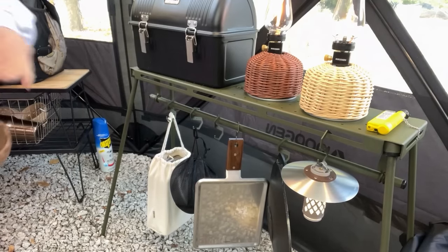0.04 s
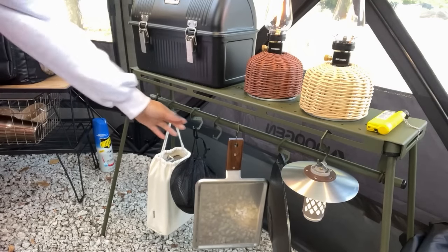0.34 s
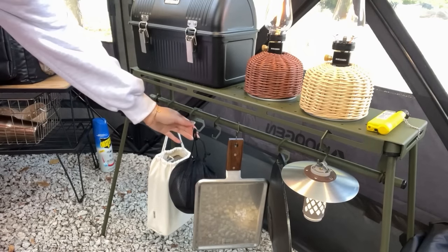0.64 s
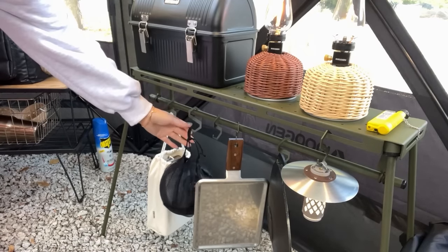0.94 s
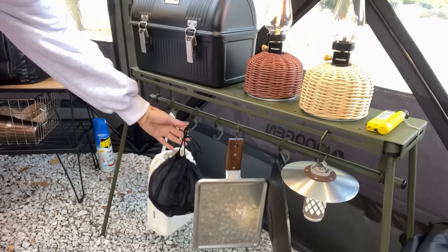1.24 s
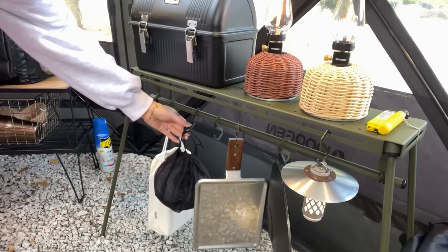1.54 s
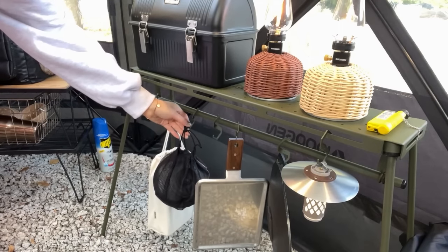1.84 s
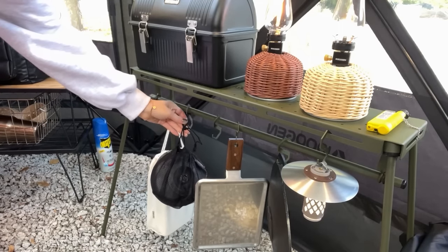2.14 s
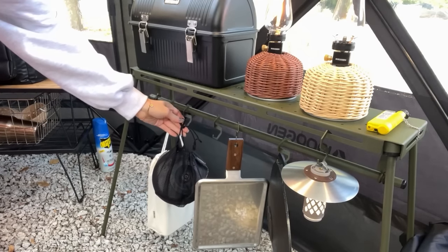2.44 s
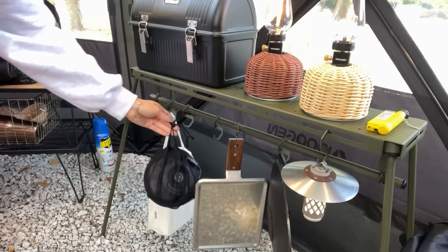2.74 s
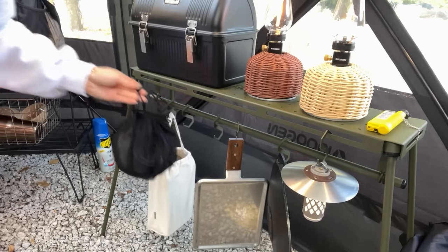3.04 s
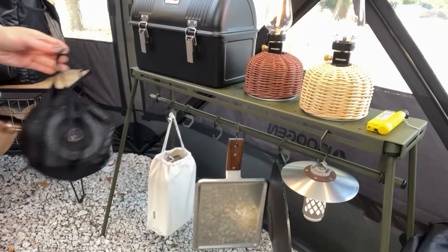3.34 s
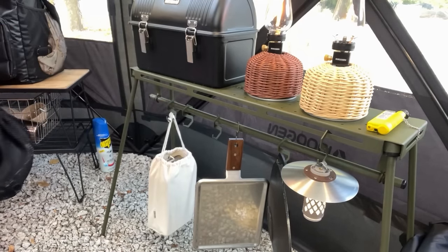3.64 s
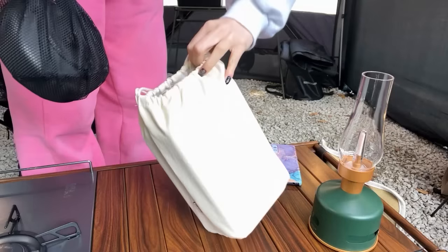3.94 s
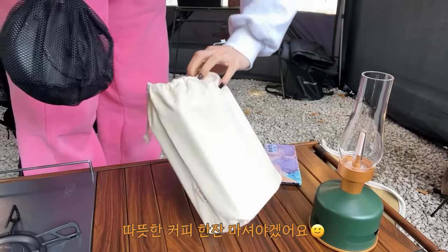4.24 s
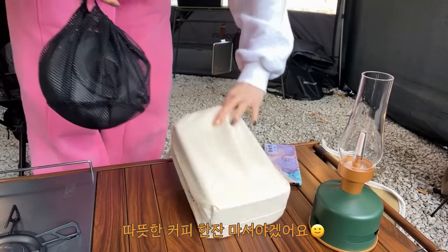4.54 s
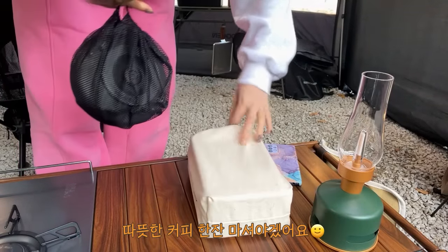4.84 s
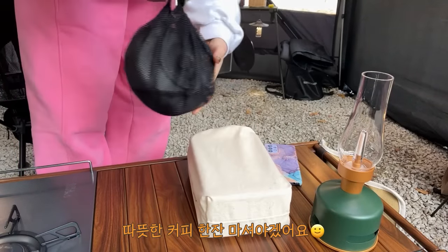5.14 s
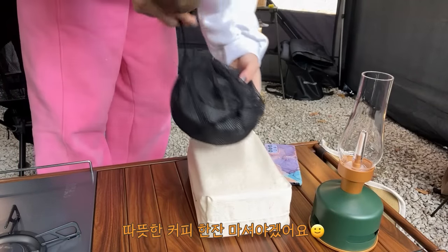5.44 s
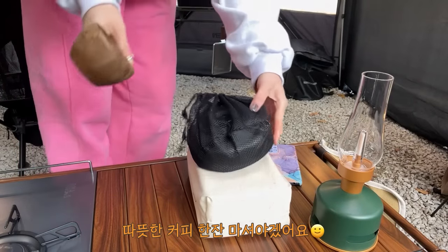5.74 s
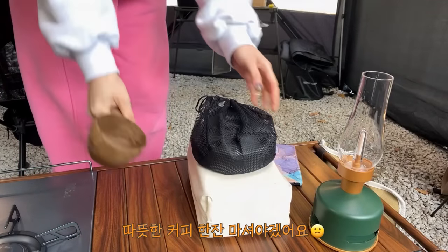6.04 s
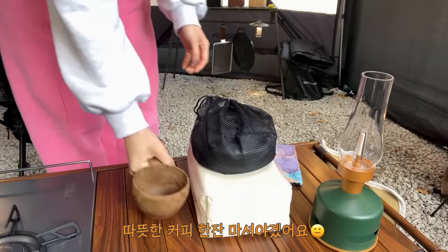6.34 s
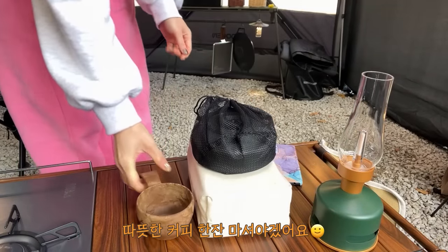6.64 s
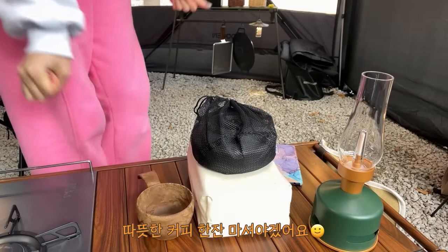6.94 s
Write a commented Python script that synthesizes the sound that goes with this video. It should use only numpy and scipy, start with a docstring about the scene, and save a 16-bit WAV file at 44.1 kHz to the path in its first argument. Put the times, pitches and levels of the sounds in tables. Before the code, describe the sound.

Over a low outdoor rumble in a tent, hooks tick, bagged pots rattle and thud on a table, and a wooden cup clatters to rest.

```python
"""Inside a tent, over a low outdoor rumble, two bags of camping cookware are lifted off a rack.
After a brief burst of hiss, steel hooks clink faintly and a cord drags over one. Cloth rustles, pots rattle.
At 4 seconds a canvas bag with a hard kit knocks onto a wooden table, making the top ring, and tips over.
At 5.7 seconds a mesh bag of pots lands on it. Last, at 6.5 seconds, a wooden cup is set down
and rocks to rest, squeaking as it skids between bounces."""
import sys
import numpy as np
from scipy import signal
from scipy.fft import rfft, irfft, next_fast_len
from scipy.io import wavfile

SR = 44100
rng = np.random.default_rng(int(sys.argv[2]) if len(sys.argv) > 2 else 0)


def persist_wave(psi):
    """Save psi, clipped to +-1, as 16-bit WAV."""
    counts = np.round(np.clip(psi, -1, 1) * 32767).astype(np.int16)
    wavfile.write(sys.argv[1], SR, np.atleast_2d(counts).T)


N = 317506
TIME = np.arange(N) / SR

# The bags knock on the table. Each row: start in seconds, level in dB, extra bass in dB, extra treble
# in dB, note of the struck spot in Hz, its boost in dB, seconds to fade by 60 dB, rise time in seconds.
BAG_KNOCKS = [(3.9604, 7, 9, 3, 810, -2, 0.044, 0.002), (3.9663, 13, 10.5, 6, 347, 5.5, 0.11, 0.00092),
              (3.986, 1, 2, 3, 1110, 15, 0.04, 0.00095), (4.001, 0.5, 11, -5, 350, -2, 0.13, 0.0011),
              (4.0051, -4.5, 12, 19, 2900, 5, 0.038, 0.0008),
              (4.031, -11.5, 15, 14, 420, 14.5, 0.061, 0.0038), (4.2495, 2, 5, -2, 780, 12.5, 0.12, 0.0014),
              (4.2718, 16.5, -3, -1, 1260, 10.5, 0.053, 0.00049),
              (4.327, 5.5, 2, -3, 734, -9, 0.32, 0.0046), (4.361, 11, -1, -2, 740, 0, 0.2, 0.0091),
              (4.392, 14, 9, 2.5, 365, 5, 0.058, 0.0033), (4.3945, 5, 6, 6, 233, 14.5, 0.049, 0.00087),
              (4.497, 6, -1, 0.5, 729, 17, 0.24, 0.0013), (4.604, -7.5, 5, -15, 960, 5, 0.031, 0.0005),
              (4.672, -4.5, 11.5, -5, 160, 3, 0.11, 0.006), (4.684, -3.5, 4, 2, 1905, 16, 0.055, 0.0033),
              (4.7012, -3, 5, -1, 1980, 10, 0.04, 0.00025), (4.705, 3.5, 1, -9, 1155, 9, 0.035, 0.00031),
              (5.685, 8, 10.5, -4.5, 372, 9, 0.074, 0.00198), (5.703, 0, 8, 4, 414, 6, 0.08, 0.0015)]
CUP_KNOCKS = [(6.4629, 27.5, 6.5, 1.5, 793, 4.5, 0.053, 0.001432),
              (6.4835, 15.5, -7, 0, 800, 7.3, 0.04, 0.0013), (6.491, 8.5, -12, 8, 1160, 14.5, 0.17, 0.0011),
              (6.5188, 24, 5, -3, 770, 6.4, 0.047, 0.00117),
              (6.5305, 10.5, -4, 7.5, 1480, 9.4, 0.11, 0.0011), (6.5476, 20, 2, -2.5, 744, 7, 0.06, 0.0012),
              (6.5644, 14.5, 0.5, -6, 694, 5.2, 0.046, 0.00184),
              (6.6252, 17.5, 4, -10, 1220, 3.5, 0.045, 0.00132),
              (6.666, 3, 4, -1, 6130, 9.1, 0.072, 0.0032), (6.6785, 17, 1.5, -10, 1300, 2, 0.075, 0.0023),
              (6.703, 2.5, 14.5, -7, 2000, 10, 0.091, 0.00214),
              (6.7316, -10, 17, -1, 2630, 16, 0.064, 0.001), (6.7962, 6, -10, -9, 1500, 2, 0.038, 0.00085),
              (6.813, -10.5, -5, 5, 1176, 4.4, 0.21, 0.002), (7.039, -4, -5, -8, 1194, 3.5, 0.12, 0.0022)]  # the cup lands and rocks; same columns
POT_RATTLES = [(3.49, -2.5, 13.5, -5, 435, 7.8, 0.063, 0.0022),
               (3.4927, -4, 3, -16, 794, 15.4, 0.04, 0.0011), (3.499, -8.5, 8, 2.5, 830, 12, 0.05, 0.00075),
               (3.503, -9.5, -6, 1, 7140, 3, 0.05, 0.0017), (5.269, -0.5, -4, -8.5, 5220, 5, 0.094, 0.0006),
               (5.312, -13, -5, -4, 4320, 1, 0.06, 0.0025),
               (5.3198, 1.5, -10, -17, 5000, 6.7, 0.11, 0.0005),
               (5.359, -9, 12, -10.5, 4550, 12, 0.05, 0.003),
               (5.522, -11.5, 15, -14.5, 5000, 2, 0.048, 0.0024),
               (5.595, -5, -13, -21, 2950, 9.7, 0.041, 0.004), (5.687, -1, 13.5, -10, 910, 10, 0.18, 0.002)]  # pots shift in the mesh bag; same columns

# Tone colours: how strong the low and high parts of a sound are. Each row: frequency in Hz, level in dB.
BAG_COLOUR = [(30, -39), (70, -5.5), (150, -3), (240, -0.5), (300, -2.5), (480, 0), (720, 2), (1200, -3),
              (1500, -9), (2000, -12.5), (3000, -17), (7000, -22), (10500, -30), (15500, -27)]
CUP_COLOUR = [(30, -32), (70, -13), (130, 1), (220, -3.5), (480, -5), (720, 0.5), (1120, -6), (1500, -7.5),
              (2000, -8.5), (2600, -10), (3700, -16), (5500, -15.5), (9000, -15.5), (10500, -33),
              (13000, -24)]
POT_COLOUR = [(30, -12), (200, -9), (900, -12), (1900, -12), (4000, -1), (7500, -1), (10500, -4.5),
              (15500, -19)]
HISS_COLOUR = [(100, -23), (400, -12), (1000, 6.5), (2500, -5), (4500, -5), (7500, -1.5), (10500, -8.5),
               (15500, -5.5)]
RUMBLE_COLOUR = [(25, -37), (40, -16), (60, -6), (86, -2), (120, -9), (240, -10.5), (340, -12),
                 (500, -12.5), (900, -18), (2500, -27.5), (5000, -37.5), (8500, -41), (10500, -61),
                 (15000, -74)]

# Modes: the notes a struck thing rings with. Each row: pitch in Hz, level in dB, seconds to fade by 60 dB.
TABLE_MODES = [(173, -11, 0.25), (245, -3, 0.064), (365, 1.5, 0.21), (597, -20, 0.46), (700, -7.5, 0.16),
               (794, -16, 0.21), (1035, -4, 0.22)]
KIT_MODES = [(1160, -12, 0.092), (1380, -20, 0.12), (1732, -0.5, 0.09), (1942, 1, 0.09), (2630, 7.5, 0.077),
             (2940, 5, 0.043)]
CUP_MODES = [(950, -3, 0.12), (1015, -6, 0.12), (1077, 0, 0.14), (1112, 5, 0.088), (1188, 3, 0.1),
             (1252, 3, 0.1), (1390, -4, 0.1), (1690, 3, 0.09), (2020, -2, 0.08), (2300, -4, 0.12),
             (2772, 0, 0.1), (2955, 0, 0.1), (3650, 4, 0.025), (4208, 1, 0.16)]
POT_MODES = [(465, 16.5, 0.071), (856, 9.5, 0.057), (1490, 8, 0.044), (2230, 8, 0.062), (2980, 6, 0.073),
             (5120, -6, 0.03)]
HOOK_MODES = [(910, 6, 0.067), (970, 4, 0.11), (2024, -2.5, 0.33), (2401, -8, 0.26), (3090, -2, 0.045),
              (3162, -5.5, 0.33), (3215, -4, 0.05), (5130, -8, 0.1), (5556, -11, 0.1), (4130, -6, 0.038),
              (4290, 3, 0.037), (6450, 0.5, 0.05)]
TICK_MODES = [(5970, -1, 0.012), (6605, -11, 0.05), (9114, -5, 0.055), (12220, 5, 0.04), (14030, -1, .075)]

# Hooks touch the rail. Each row: start in seconds, level in dB, frequency in Hz above which it is dulled,
# boost of the lowest modes in dB, click level in dB.
HOOK_CLINKS = [(.903, -57.5, 5000, 3, 10), (1.792, -56.5, 9000, -1, 9), (1.958, -63.5, 3600, 0, 2),
               (1.995, -66, 3600, 0, -2)]
HOOK_TICK = [(.4962, -43, 20000, 0, 19)]  # a small tick as the hand reaches the hook; same columns

# Sounds that swell and fade. Each row: loudest moment in seconds, level in dB, length in seconds.
CUP_SKIDS = [(6.537, -20, 0.022), (6.562, -19, 0.013), (6.574, -26, 0.0094)]
CORD_PULLS = [(2.06, -55.5, 0.2), (2.22, -56, .07), (2.44, -50, 0.085)]
HISS_SWELLS = [(.005, -38, 0.012), (2.25, -61, 0.11), (3.18, -59.5, 0.072), (3.53, -48.5, 0.063),
               (4.05, -58, 0.24), (4.38, -46.5, 0.21), (4.56, -56, 0.48), (4.87, -49, 0.084),
               (5.33, -53, 0.18), (5.68, -52.5, 0.15), (5.88, -47, 0.14), (7.15, -58, 0.57)]  # first a brief burst of hiss at the very start; the rest is cloth rubbing

# Soft bumps of handling. Each row: loudest moment in seconds, level in dB, pitch in Hz, length in seconds.
BUMPS = [(0.339, -42.5, 85, 0.048), (0.48, -42, 79, 0.019), (1.469, -42.5, 87, 0.02),
         (1.873, -42, 78, 0.016), (2.54, -37.5, 89, 0.029), (5.823, -40.5, 87, 0.016)]

# Stereo width. Each row: frequency in Hz, level in dB of what differs between the ears over what is shared.
KNOCK_WIDTH = [(100, -41), (200, -25), (400, -7.5), (1000, -7.5), (2000, -2.5), (4000, 0.5), (9000, -21.5)]
AIR_WIDTH = [(60, -22.5), (150, -10.5), (300, -5), (700, 2), (1500, 3), (4000, -2.5), (9000, -21)]


def wooden_table():
    """The bags, a little to the right, and the cup, a little to the left, make the same top ring."""
    knocks = placed(bag_knocks(), left_db=-0.5, lead_samples=-1.67)
    knocks += placed(cup_knocks() + cup_skids(), left_db=0.5, lead_samples=1.8)
    return from_db(-2) * bending_waves(ringing(knocks, TABLE_MODES), delay_at_1khz_s=0.001416)


def bag_knocks():
    """The padded bags land, and the hard kit in the canvas one rings."""
    out = np.zeros((2, N))
    for start, *row in BAG_KNOCKS:
        add(out, start, knock(BAG_COLOUR, row, click_db=-14.5, chatter_db=-0.5, spot_fade_s=0.053,
                              tail_db=-4.5, tail_fade_s=0.16, tail_hz=6000, push_hz=159))
    return ringing(out, KIT_MODES)


def cup_knocks():
    """The bare wooden cup lands and rocks, ringing at each bounce."""
    out = np.zeros((2, N))
    for start, *row in CUP_KNOCKS:
        add(out, start, knock(CUP_COLOUR, row, click_db=-9, chatter_db=2.5, spot_fade_s=0.017,
                              tail_db=-8.5, tail_fade_s=0.17, tail_hz=11000, push_hz=380, top_share=0.9))
    return ringing(out, CUP_MODES)


def cup_skids(pitch_hz=1117, octave_db=-37):
    """Between bounces the foot of the cup sticks and slips: a short, wavering squeak."""
    hz = pitch_hz * flicker(spread_db=0.3, per_s=260, size=N)
    phase = 2 * np.pi * np.cumsum(hz) / SR
    squeak = np.sin(phase) + from_db(octave_db) * np.sin(2 * phase)
    return swells(CUP_SKIDS) * flicker(spread_db=1.5, per_s=330, size=N) * unit_level(squeak)


def pot_rattles():
    """Nested pots clack together, and their bag stops the ringing quickly."""
    out = np.zeros((2, N))
    for start, *row in POT_RATTLES:
        add(out, start, knock(POT_COLOUR, row, click_db=-11.5, chatter_db=5.0, spot_fade_s=0.011,
                              tail_db=-2.5, tail_fade_s=0.075, tail_hz=8000, push_hz=60))
    return ringing(out, POT_MODES)


def knock(colour, row, click_db, chatter_db, spot_fade_s, tail_db, tail_fade_s, tail_hz, push_hz,
          top_share=0):
    """One hit: a click, the chattering body, the note of the struck spot and a dull echo from the tent."""
    level_db, bass_db, treble_db, spot_hz, spot_db, fade_s, rise_s = row
    size, bass_hz, treble_hz, top_hz = SR // 2, 430, 2100, 9500
    click = signal.unit_impulse(size, round(rise_s * SR))
    body = dying_noise(fade_s, size, rise_s)
    body_treble = signal.sosfilt(signal.butter(1, treble_hz, "high", fs=SR, output="sos"), body)
    body += body_treble * (flicker(chatter_db, per_s=500, size=size) - 1)
    hit = (body + from_db(click_db) * click) / np.hypot(1, from_db(click_db))
    # long waves are not scattered: below push_hz the hit is one clean push
    hit += signal.sosfilt(signal.butter(1, push_hz, fs=SR, output="sos"), click - hit)
    hit += from_db(spot_db) * resonance(click, spot_hz, spot_fade_s)
    tail = dying_noise(tail_fade_s, size, rise_s=0.018)
    tail = coloured(tail, lambda hz: -10 * np.log10(1 + (hz / tail_hz) ** 2 + (260 / (hz + 1)) ** 2))
    hit += from_db(tail_db) * tail

    def tone_db(hz):
        """A heavy hit brings bass, a hard one treble; top_share adds more at the very top."""
        highs = 1 - below(hz, treble_hz) + top_share * (1 - below(hz, top_hz))
        return level_db + db_at(colour, hz) + bass_db * below(hz, bass_hz) + treble_db * highs
    return coloured(hit, tone_db)


def steel_clinks(touches, modes, scatter_db, scatter_fade_s, click_fade_s):
    """Lightly touched steel clicks and rings, and the gear around scatters the ring."""
    out, t = np.zeros((2, N)), np.arange(SR // 2) / SR
    for start, level_db, dull_hz, low_db, click_db in touches:
        ring = sum(from_db(db + rng.normal(0, 1.5) - 60 * t / fade_s) * np.sin(2 * np.pi * hz * t)
                   for hz, db, fade_s in modes)
        scatter = signal.fftconvolve(dying_noise(scatter_fade_s, len(t)), ring[None], axes=1)[:, :len(t)]
        click = dying_noise(click_fade_s, len(t))
        clink = ring + from_db(scatter_db) * scatter + from_db(click_db) * click
        tone_db = lambda hz: level_db + low_db * below(hz, 1400) + 10 * np.log10(below(hz, dull_hz))
        add(out, start, coloured(clink, tone_db))
    return out


def cord_drag():
    """A cord rubs softly over its hook and stirs only the two lowest modes."""
    friction = stereo_noise(AIR_WIDTH, N)
    ring = sum(resonance(friction, hz, fade_s=0.094) for hz, _, _ in HOOK_MODES[:2])
    return swells(CORD_PULLS) * unit_level(ring)


def hiss_and_cloth(steady_db=-67.5):
    """A brief opening hiss; later, cloth threads catch and slip in grains that clump as folds shift."""
    hiss = stereo_noise(AIR_WIDTH, N)
    grains = flicker(spread_db=-1.0, per_s=230, size=N)
    clumps = flicker(spread_db=2.4, per_s=45, size=N)
    # at the table, close by, clothes also rustle between the swells
    level = np.hypot(swells(HISS_SWELLS) * clumps, from_db(steady_db) * at_table())
    return level * unit_level(coloured(hiss * grains, lambda hz: db_at(HISS_COLOUR, hz)))


def handling_bumps():
    """Each soft bump of handling is a few cycles of deep bass."""
    out = np.zeros(N)
    for peak_s, db, hz, length_s in BUMPS:
        t = TIME - peak_s
        out += from_db(db) * np.exp(-(t / length_s) ** 2) * np.sin(2 * np.pi * (hz * t + rng.random()))
    return out


def outdoor_rumble(rack_db=-48.5, table_db=-47):
    """A far rumble comes through the tent wall, a little louder at the table."""
    rumble = coloured(stereo_noise(AIR_WIDTH, N), lambda hz: db_at(RUMBLE_COLOUR, hz))
    return from_db(rack_db + (table_db - rack_db) * at_table()) * unit_level(rumble)


def at_table(start_s=3.24, move_s=0.87):
    """Slides from 0 at the rack to 1 at the table."""
    return np.clip((TIME - start_s) / move_s, 0, 1)


def swells(rows, rise_share=0.53, fall_share=0.71, shape=0.95):
    """The volume swells to each peak and fades; shape 1 is pointed, 2 is rounded."""
    power = 0
    for peak_s, db, length_s in rows:
        away = np.abs(TIME - peak_s) / (length_s * np.where(TIME < peak_s, rise_share, fall_share))
        power += (from_db(db) * np.exp(-np.minimum(away, 20) ** shape)) ** 2
    return np.sqrt(power)


def flicker(spread_db, per_s, size):
    """A volume that wanders to a new random value per_s times a second."""
    place = np.arange(size) * per_s / SR
    wander = np.interp(place, np.arange(size // 8), rng.standard_normal(size // 8))
    return unit_level(from_db(spread_db * wander))


def bending_waves(x, delay_at_1khz_s):
    """Low notes travel slowly through a board: a quarter of the frequency takes twice as long."""
    size = next_fast_len(N + 8192)
    hz = np.arange(size // 2 + 1) * SR / size
    phase = 4 * np.pi * delay_at_1khz_s * np.sqrt(1000 * hz)
    return irfft(rfft(x, size) * np.exp(-1j * phase), size)[:, :N]


def ringing(x, modes):
    """A thing's modes ring on after each hit."""
    return x + sum(from_db(db) * resonance(x, hz, fade_s) for hz, db, fade_s in modes)


def resonance(x, hz, fade_s):
    """A filter that rings at one pitch and fades by 60 dB in fade_s."""
    r = 1000 ** (-1 / (fade_s * SR))
    feedback = [1, -2 * r * np.cos(2 * np.pi * hz / SR), r * r]
    return signal.lfilter(np.array([1, 0, -1]) * (1 - r * r) / 2, feedback, x + 1e-18)


def dying_noise(fade_s, size, rise_s=0.00019):
    """Countless close modes and echoes build up and die away together."""
    t = np.arange(size) / SR
    level = (1 - np.exp(-t / rise_s)) * 1000 ** (-t / fade_s)
    return stereo_noise(KNOCK_WIDTH, size) * level / np.sqrt(np.sum(level ** 2))


def stereo_noise(width, size):
    """White noise, partly shared by both ears and partly different."""
    shared, side = rng.standard_normal((2, size))
    total_db = lambda hz: 10 * np.log10(1 + from_db(db_at(width, hz)) ** 2)
    side = coloured(side, lambda hz: db_at(width, hz) - total_db(hz))
    return coloured(shared, lambda hz: -total_db(hz)) + side * [[1], [-1]]


def placed(x, left_db, lead_samples):
    """Give a sound a direction: the left side hears it left_db louder and lead_samples earlier."""
    size, sides = 2 * next_fast_len(N // 2 + 512), np.array([[.5], [-.5]])
    shift = np.exp(2j * np.pi * sides * lead_samples * np.arange(size // 2 + 1) / size)
    return from_db(sides * left_db) * irfft(rfft(x, size) * shift)[:, :N]


def coloured(x, tone_db):
    """Turn each frequency up or down by tone_db(hz)."""
    size = 2 * next_fast_len(x.shape[-1] // 2 + 4096)
    hz = np.arange(size // 2 + 1) * SR / size
    cepstrum = irfft(np.log(from_db(tone_db(hz))))
    # folding it in half keeps the filter from sounding ahead of a hit (minimum phase)
    cepstrum[1:size // 2] *= 2
    cepstrum[size // 2 + 1:] = 0
    return irfft(rfft(x, size) * np.exp(rfft(cepstrum)))[..., :x.shape[-1]]


def below(hz, edge_hz):
    """Near 1 below the edge, falling smoothly to 0 above it."""
    return 1 / (1 + (hz / edge_hz) ** 4)


def db_at(table, hz):
    """Read a level between the rows of a colour or width table."""
    row_hz, row_db = np.transpose(table)
    return np.interp(np.log(hz + 1), np.log(row_hz), row_db)


def from_db(db):
    """Turn decibels into a multiplier."""
    return 10 ** (np.asarray(db) / 20)


def unit_level(x):
    """Scale to an average power of 1."""
    return x / np.sqrt(np.mean(x ** 2))


def add(out, start_s, sound):
    """Mix a sound in at its start time."""
    i = round(start_s * SR)
    out[..., i:i + sound.shape[-1]] += sound[..., :N - i]


def scene():
    """All sources, each in its place before the microphone."""
    hooks = steel_clinks(HOOK_CLINKS, HOOK_MODES, scatter_db=5, scatter_fade_s=0.094, click_fade_s=0.023)
    hooks += cord_drag()
    tick = steel_clinks(HOOK_TICK, TICK_MODES, scatter_db=-9, scatter_fade_s=0.08, click_fade_s=0.014)
    around = placed(outdoor_rumble() + handling_bumps() + hooks + tick, left_db=0.46, lead_samples=1.68)
    table = wooden_table()
    pots_and_hiss = placed(pot_rattles() + hiss_and_cloth(), left_db=0.1, lead_samples=-1.91)
    return around + table + pots_and_hiss


def record(dry, cutoff_hz=16000):
    """Round off the loudest peaks and cut the highest treble."""
    rounded = 1.219 * np.tanh(dry / 1.145)
    return signal.sosfilt(signal.ellip(10, .2, 80, cutoff_hz, fs=SR, output="sos"), rounded)


dry = scene()
out = record(dry)
persist_wave(out)
```